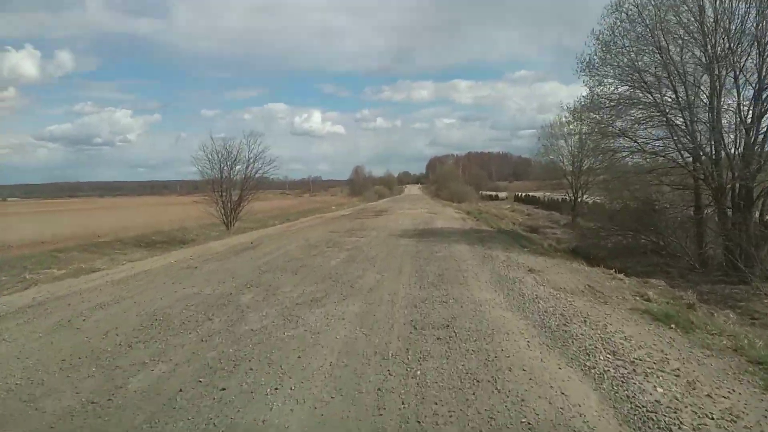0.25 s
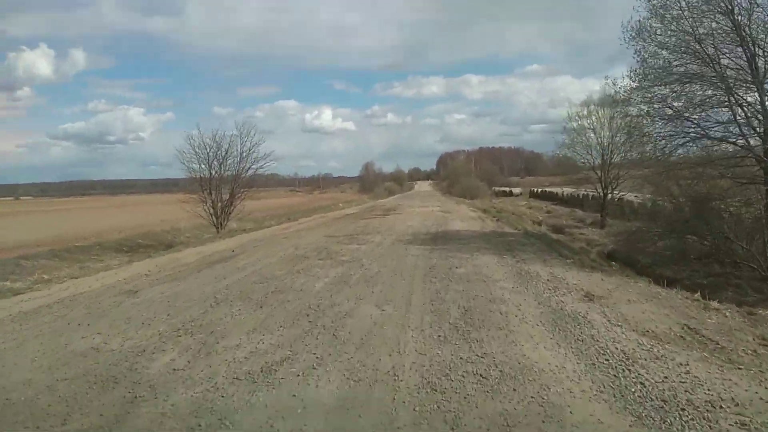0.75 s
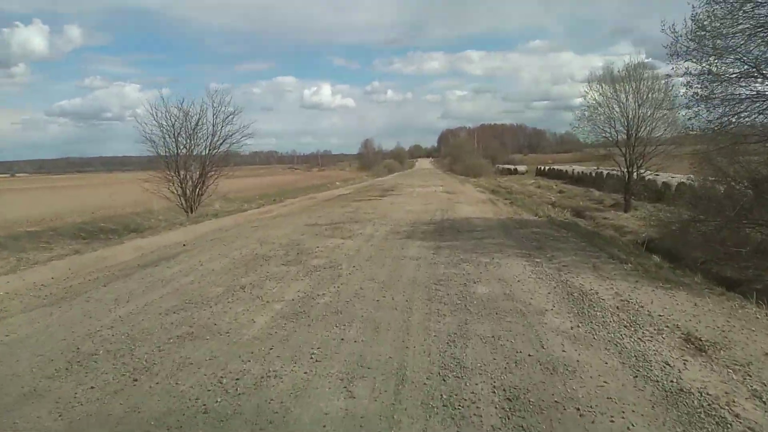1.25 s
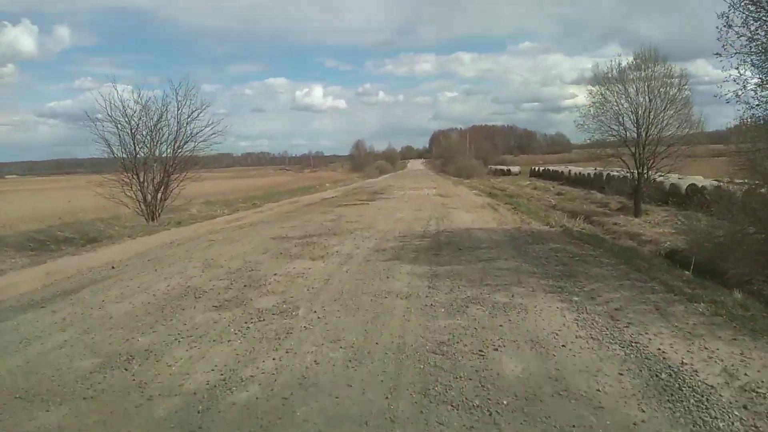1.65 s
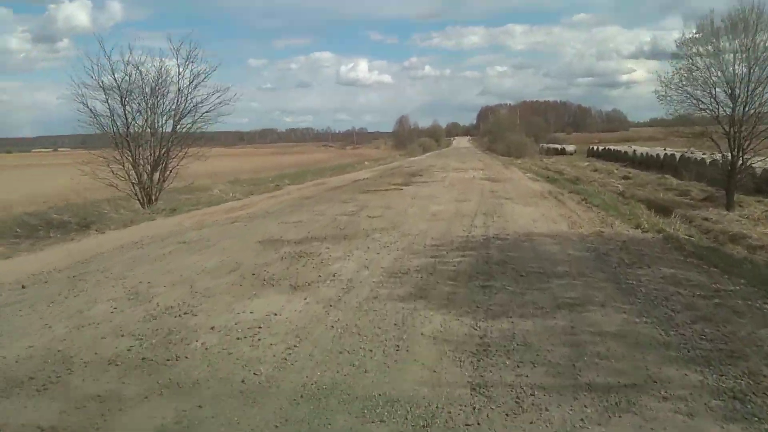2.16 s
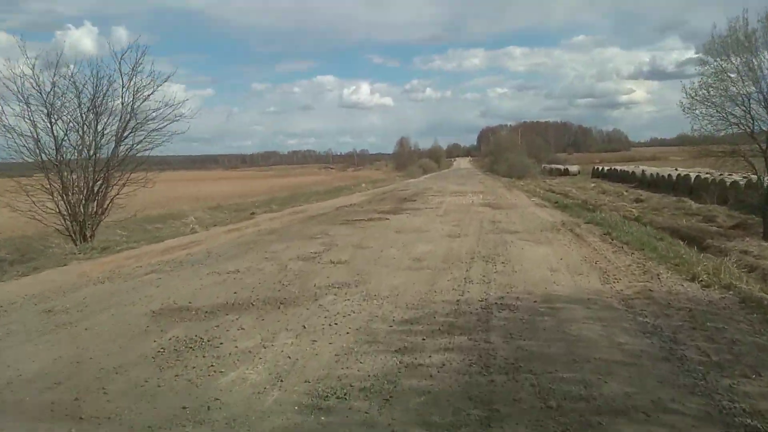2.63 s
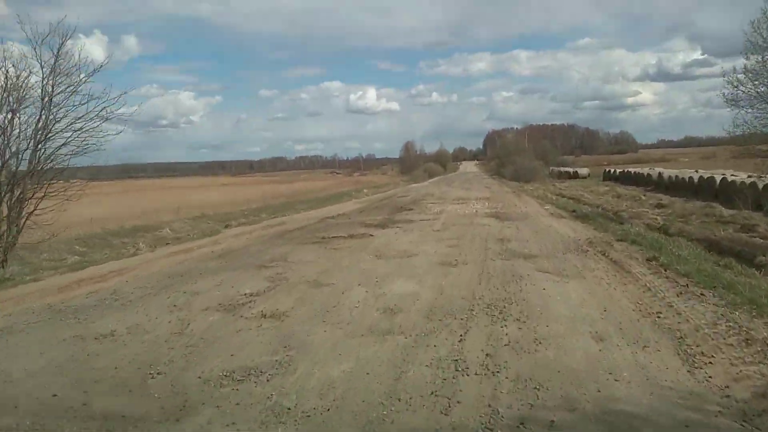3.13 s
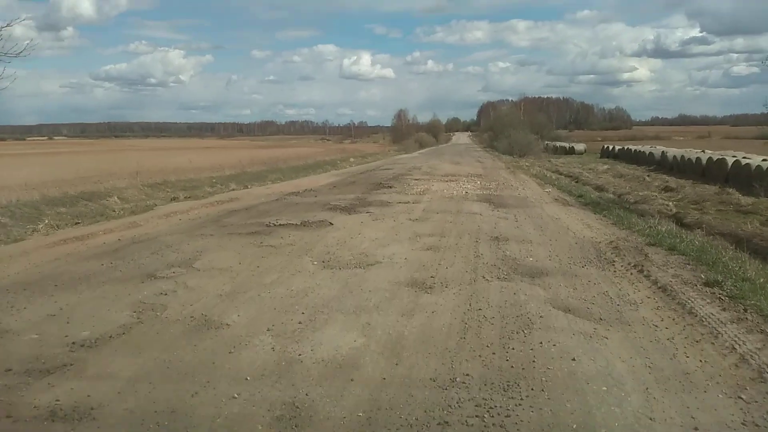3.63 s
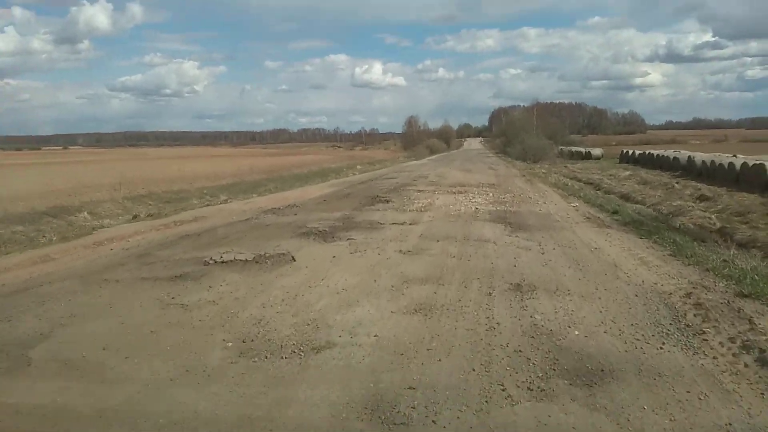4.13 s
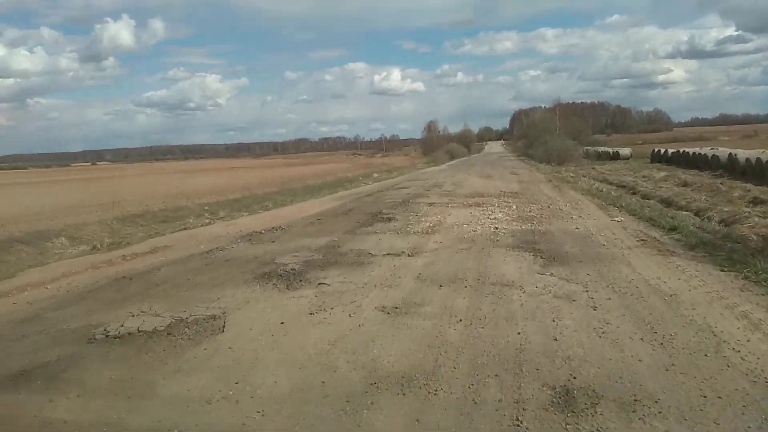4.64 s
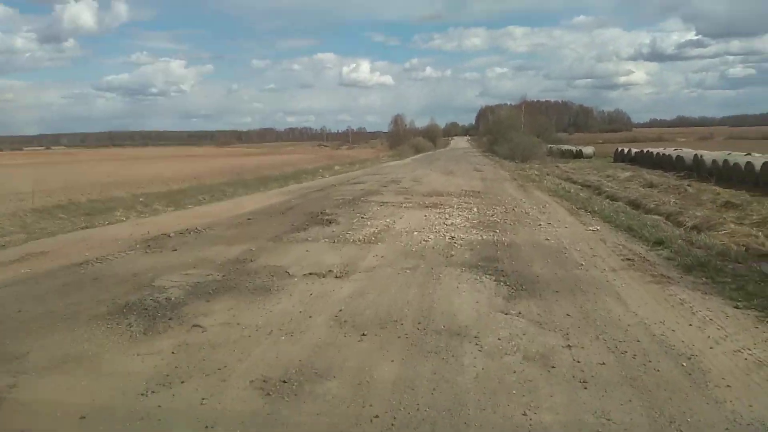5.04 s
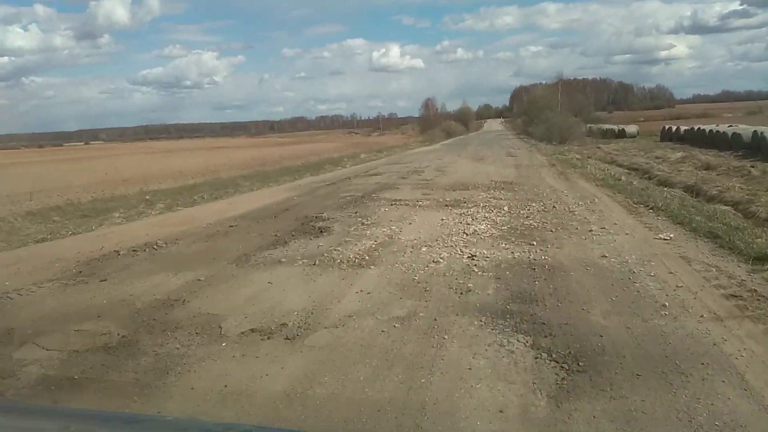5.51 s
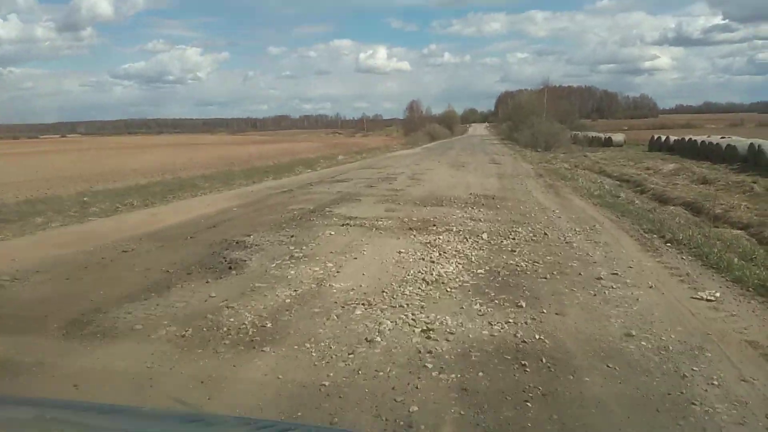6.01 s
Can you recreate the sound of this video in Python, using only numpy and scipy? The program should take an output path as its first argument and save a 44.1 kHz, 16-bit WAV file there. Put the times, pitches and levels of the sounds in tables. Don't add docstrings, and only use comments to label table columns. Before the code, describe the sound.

Inside a car on a potholed gravel road, heard in stereo close to the dashboard. It opens with a dry plastic tick and a burst of small rattling within the first 0.2 s, then hollow knocks at about 0.25, 0.4 and 0.9 s with low body boom. Stones thud dully on the floor pan; trim clunks and buzzes, with metallic chinks above. Sharper stone strikes land near 1.5 and 1.9 s, harder wheel knocks at 2.4 and 2.6 s. From 3.1 to 3.7 s comes the deepest boom, with several thuds and a bright chink near 3.3 s. A hard strike hits at 4.45 s, then a short easing. A run of quick knocks fills 4.9 to 5.3 s. It falls nearly quiet until 5.7 s, leaving faint rumble and hiss; then knocks, a thin metal glint near 5.84 s and rattles return to the end at 6.3 s.

```python
import sys
import numpy as np
from scipy import signal
from scipy.fft import rfft, irfft
from scipy.io import wavfile
from scipy.ndimage import uniform_filter1d

SR = 44100
rng = np.random.default_rng(int(sys.argv[2]) if len(sys.argv) > 2 else 0)


def store_pcm(level_fs):
    pcm = np.round(np.clip(level_fs, -1, 1) * 32767).astype(np.int16)
    wavfile.write(sys.argv[1], SR, np.atleast_2d(pcm).T)


def ratio(d):
    e = np.asarray(d, float) / 20
    return 10 ** e


N = 276507
BINS_HZ = np.fft.rfftfreq(8192, 1 / SR) + 1


def rms_one(x):
    return x / np.sqrt(np.mean(x ** 2) + 1e-20)


def in_time(rows):
    s, db = np.transpose(rows)
    return ratio(np.interp(np.arange(N) / SR, s, db))


def at_hz(points, hz):
    points_hz, value = np.transpose(points)
    return np.interp(np.log(hz), np.log(points_hz), value)


def sides(db):
    return ratio(np.array([[0.5], [-0.5]]) * db)


def resonate(x, hz, width_hz):
    r = np.exp(-np.pi * width_hz / SR)
    zeros = np.array([1, 0, -1]) * (1 - r * r) / 2
    poles = [1, -2 * r * np.cos(2 * np.pi * hz / SR), r * r]
    return signal.lfilter(zeros, poles, x)


def contacts(per_s, spread_db):
    when, size = rng.random(N), rng.uniform(-1, 1, N)
    hit = when < per_s / SR
    out = np.full(N, 1e-18)
    size = size[hit]
    out[hit] = np.sign(size) * ratio(spread_db * np.minimum(-np.log(np.abs(size)), 4))
    return out


def evened(x, over_s, share):
    power = uniform_filter1d(np.mean(rms_one(x) ** 2, axis=0), int(over_s * SR)) + 0.024
    return rms_one(x / power ** (share / 2))


def motion(rows, rise, fall, rest_db):
    t = np.arange(0, N + 64, 64) / SR
    rows = np.array(rows)
    start = rows[:, :1]
    end = start + np.abs(rows[:, 1:2])
    loss_db = rise * np.maximum(start - t, 0) + fall * np.maximum(t - end, 0)
    gains = []
    for db in rows[:, 2:].T:
        power = ratio(rest_db) ** 2 + np.sum(ratio(db[:, None] - loss_db) ** 2, axis=0)
        gains.append(np.interp(np.arange(N) / SR, t, np.sqrt(power)))
    return gains


# (f/Hz, left-right level/dB)
LEANING = [(60, 6.3), (150, 2.2), (380, 0), (950, .8), (2400, 0), (5500, 1.7), (9800, -.8), (12500, -8),
           (15000, -9)]


def shaken(modes, per_s, spread_db, own_db, over_s):
    out = 0
    for hz, width_hz, db in modes:
        shared = contacts(per_s, spread_db)
        own = np.array([contacts(per_s, spread_db) for side in "LR"])
        force = shared + ratio(own_db) * own
        ringing = resonate(resonate(force, hz, 2.0 * width_hz), hz, width_hz)
        out = out + ratio(db) * sides(at_hz(LEANING, hz)) * rms_one(ringing)
    return evened(out, over_s, share=0.32)


# (f/Hz, left-right likeness [0-1])
LIKENESS = [(60, 0.89), (180, 0.81), (600, 0.6), (900, 0.33), (1650, 0.25)]


def cabin_paths(colour_db, t60, crack_db, count, crack_s=0.031):
    t = np.arange(8192) / SR
    mid, side = rfft(rng.standard_normal((2, count, 1, 8192)))
    alike = np.clip(at_hz(LIKENESS, BINS_HZ), -1, 1)
    pair = np.sqrt(1 + alike) * mid + np.sqrt(1 - alike) * side * [[1], [-1]]
    place = rng.permutation(count)[:, None, None] / count
    ripple_db = 5.0 * np.sin(9.0 * np.log(BINS_HZ) + 2 * np.pi * place)
    noise = irfft(pair * ratio(colour_db + ripple_db) * sides(at_hz(LEANING, BINS_HZ)))
    crack = ratio(-60 * t / crack_s)
    rise = np.minimum(t / 0.0008, 1)
    return noise * (ratio(-60 * t / t60) + ratio(crack_db) * crack) * rise


def rattling(level, colour_db, per_s, spread_db, t60, crack_db, count):
    busy = per_s * (level / level.max()) ** 0.3
    out = 0
    for path in cabin_paths(colour_db, t60, crack_db, count):
        touches = contacts(busy / count, spread_db)[None]
        out = out + signal.oaconvolve(touches, path, axes=1)[:, :N]
    return level * evened(out, over_s=0.13, share=0.068)


def clacks(table, colour_db, t60, crack_db, broad, sharpness, lift_db):
    out = np.zeros((2, N + 8192))
    paths = cabin_paths(colour_db, t60, crack_db, count=len(table), crack_s=0.0032)
    for (s, db, hz), path in zip(table, paths):
        sound = broad * path + resonate(path, hz, hz / sharpness)
        i = round(s * SR)
        out[:, i:i + 8192] += ratio(db + lift_db) * sound / np.abs(sound).max()
    return out[:, :N]


def after_rattle(table, t60):
    kicks = np.full(N, 1e-12)
    kicks[[round(row[0] * SR) for row in table]] = ratio(np.array(table)[:, 1])
    return signal.lfilter([1], [1, -ratio(-60 / (t60 * SR))], kicks)


# (t/s, shell boom level/dB)
HEAVES = [(0.023, -33.5), (0.264, -27.5), (0.436, -31.5), (0.585, -31.5), (0.844, -24), (1.058, -33.5),
          (1.192, -34), (1.405, -31.5), (1.617, -29), (1.918, -25.5), (2.16, -31.5), (2.268, -29),
          (2.448, -32), (2.664, -23), (2.92, -39.5), (3.317, -19.5), (3.464, -28.5), (3.645, -26.5),
          (3.92, -26.5), (4.192, -29), (4.498, -33.5), (4.653, -36), (4.8, -42.5), (4.913, -37.5),
          (5.126, -23.5), (5.403, -31), (5.523, -40), (5.894, -33.5), (6.114, -34.5)]
# (f/Hz, width f/Hz, level/dB)
SHELL = [(30.5, 27, -16), (56.3, 32, -15.5), (62.3, 9.9, -6), (71.3, 10.5, -2), (87.7, 32, -1.5)]


def shell_boom():
    heave, = motion([(s, 0, db) for s, db in HEAVES], rise=78, fall=145, rest_db=-51.5)
    return heave * ratio(1.5) * shaken(SHELL, 300, spread_db=2.5, own_db=-12, over_s=0.067)


# (t/s, length t/s, tyre and suspension shake level/dB)
PATCHES = [(0.001, 0.0041, -41), (0.067, 0.078, -34), (0.191, 0.14, -27.5), (0.42, 0.054, -26.5),
           (0.683, 0.11, -49), (0.805, 0.12, -31), (1.084, 0.085, -31.5), (1.323, 0.017, -27.5),
           (1.415, 0.2, -31.5), (1.685, 0.014, -46), (1.824, 0.15, -30.0), (2.033, 0.0078, -30.5),
           (2.125, 0.13, -29.5), (2.301, 0.037, -28), (2.413, 0.0062, -22.5), (2.564, 0.16, -34.5),
           (2.794, 0.019, -55), (2.905, 0.092, -38), (3.109, 0.32, -27), (3.573, 0.12, -28.5),
           (3.822, 0.082, -28.5), (4.046, 0.074, -27.5), (4.275, 0.15, -66), (4.45, 0.03, -29.5),
           (4.802, 0.13, -37), (5.019, 0.14, -25.5), (5.293, 0.047, -48), (5.507, 0.0021, -44.5),
           (5.751, 0.14, -34.5), (5.991, 0.12, -31.5)]
# (f/Hz, width f/Hz, level/dB)
WHEEL = [(138, 28, -1), (147.5, 43, -6), (175, 17.7, -4), (190, 26, -1.5), (225.4, 57, -12)]


def wheel_shake():
    shake, = motion(PATCHES, rise=840, fall=202, rest_db=-70)
    return shake * ratio(-1.0) * shaken(WHEEL, 120, spread_db=4.5, own_db=-11, over_s=0.01)


# (t/s, peak level/dB, ring f/Hz)
KNOCKS = [(0.241, -16, 184), (0.416, -12.5, 147), (0.802, -28, 184), (0.87, -11.5, 182),
          (2.411, -20.5, 132), (2.614, -11.5, 162), (3.11, -18, 173), (3.31, -16, 72),
          (3.577, -13.5, 172.6), (3.677, -26, 151), (4.045, -19.5, 185.4), (4.789, -32, 182.2),
          (4.867, -18.5, 179.7), (5.013, -21, 152), (5.079, -16, 162.7), (5.141, -12.5, 165),
          (5.206, -19.5, 159.4), (5.291, -24, 170), (5.783, -21, 190.6), (5.868, -27, 169),
          (5.988, -22, 199), (6.066, -17.5, 136), (6.09, -18.5, 157)]
# (t/s, peak level/dB, ring f/Hz)
STRIKES = [(0.077, -28, 139), (0.175, -21, 202.6), (1.101, -24.5, 191), (1.329, -21, 171),
           (1.445, -21, 239), (1.493, -14.5, 175), (1.906, -10.5, 175), (2.176, -23.5, 188),
           (2.563, -23, 147), (2.932, -33, 151), (2.975, -26, 182), (3.819, -26, 159), (4.433, -23.5, 205),
           (4.449, -11, 188.5), (4.465, -24.5, 202), (5.736, -26, 191.5)]


def knocks():
    out, t = np.zeros(N + SR), np.arange(SR // 2) / SR
    blows = [(*row, -27.5) for row in KNOCKS] + [(*row, -10.5) for row in STRIKES]
    for (s, db, hz, arm_db), (a, b) in zip(blows, rng.random((len(blows), 2))):
        arm = np.sin(2 * np.pi * (280 + 70 * a) * t)
        arm += 0.76 * np.sin(2 * np.pi * (380 + 90 * b) * t)
        ring = np.sin(2 * np.pi * hz * t) + ratio(arm_db) * arm
        t60 = np.clip(0.16 * ratio(-0.42 * (db + 17.5)), 0.03, 0.4)
        rise = np.minimum(t / 0.0036, 1)
        i = round(s * SR)
        out[i:i + len(t)] += ratio(db - 2.5 - 60 * t / t60) * rise * ring
    return out[:N] * sides(3.8)


# (t/s, level/dB)
PAN_LEVEL = [
    (0, 2),
    (1.5, 4),
    (3.0, -0.5),
    (3.9, 0),
    (4.5, -7),
    (5.2, -6),
    (6.27, -2),
]
# (f/Hz, width f/Hz, level/dB)
PAN = [(261, 39, -1), (309, 104, -8.5), (358, 147, -1), (419.7, 55, -4), (484, 50, -5.5)]


def floor_pan(buzz):
    wheels, = motion(PATCHES, rise=750, fall=230, rest_db=-65)
    flexing = wheels ** 0.48 * buzz ** 0.5 * in_time(PAN_LEVEL)
    return flexing * ratio(-6.0) * shaken(PAN, 200, spread_db=3.0, own_db=-3, over_s=0.2)


# (t/s, peak level/dB, ring f/Hz)
THUDS = [(0.062, -39, 417), (0.104, -24, 258), (0.178, -22, 244), (0.408, -53, 437), (0.429, -26, 252),
         (0.71, -34, 460), (0.802, -34, 262), (1.015, -29, 396), (1.073, -30, 299), (1.158, -29, 245),
         (1.23, -29, 245), (1.311, -34, 245), (1.341, -27, 280), (1.575, -23, 256), (1.825, -40, 334),
         (1.888, -20, 294), (1.907, -16, 261), (1.989, -34, 298), (2.124, -26.5, 280), (2.273, -28, 298),
         (2.384, -36, 415), (2.413, -38, 394), (2.559, -20, 240), (2.58, -31, 272), (2.654, -25.5, 285),
         (3.063, -41, 261), (3.118, -39, 253), (3.2, -20, 247), (3.236, -21, 261), (3.313, -18.5, 261),
         (3.382, -21, 310), (3.462, -23.5, 325), (3.559, -41, 260), (3.589, -29, 244), (3.805, -36, 246),
         (3.862, -26, 314), (4.037, -41, 247), (4.432, -28.5, 294), (4.865, -38, 248), (5.015, -20, 248),
         (5.04, -21, 248), (5.739, -41.5, 243), (5.791, -24.5, 247), (5.882, -30, 254), (5.975, -37, 242),
         (6.072, -23, 242)]


def thuds():
    out, t = np.zeros((2, N + SR)), np.arange(SR // 5) / SR
    t60, rise_s = 0.093, 0.0028
    for (s, db, hz), lean in zip(THUDS, rng.uniform(-1.3, 1, len(THUDS))):
        phase = 0.58 * lean * np.array([[1], [-1]])
        ring = np.sin(2 * np.pi * hz * t + phase)
        ring += ratio(-13.5) * np.sin(2 * np.pi * 1.45 * hz * t)
        i = round(s * SR)
        out[:, i:i + len(t)] += ratio(db - 2.5 - 60 * t / t60) * np.minimum(t / rise_s, 1) * ring
    return out[:, :N]


# (t/s, length t/s, level/dB)
BUZZES = [(0.045, 0.14, -38.5), (0.391, 0.24, -46), (0.702, 0.35, -46), (1.076, 0.37, -44.5),
          (1.457, 0.1, -42), (1.661, 0.095, -48.5), (1.815, 0.2, -46), (2.063, 0.3, -45.5),
          (2.411, 0.17, -42), (2.658, 0.03, -41.5), (2.758, 0.14, -48.5), (2.876, 0.15, -43),
          (3.11, 0.33, -49), (3.264, 0.11, -37.5), (3.576, 0.67, -47.5), (3.806, 0.051, -48.5),
          (4.443, 0.13, -49), (4.851, 0.066, -48), (5.037, 0.027, -50.5), (5.141, 0.084, -46),
          (5.771, 0.011, -41), (5.87, 0.026, -46.5), (5.973, 0.027, -50.5), (6.091, 0.102, -41)]


def trim_motion():
    return motion(BUZZES, rise=560, fall=138, rest_db=-72)[0]


# (f/Hz, width f/Hz, lift level/dB)
PANELS = [(606.3, 14, 10.5), (830, 35, -3.5), (872.5, 18.4, 11), (1063, 26, 9.5), (1360, 120, 3),
          (1910, 180, 7), (2440, 120, 7)]
# (f/Hz, level/dB per Hz)
TRIM = [(300, -48), (450, -16), (560, -5), (800, -6.5), (1400, -12.5), (1700, -19.5), (2300, -21.5),
        (5000, -41.5)]


def trim(level):
    colour_db = at_hz(TRIM, BINS_HZ)
    for hz, width_hz, lift_db in PANELS:
        colour_db = colour_db + lift_db / (1 + (2 * (BINS_HZ - hz) / width_hz) ** 2)
    return rattling(level, colour_db, 1500, spread_db=3.5, t60=0.087, crack_db=6.0, count=8)


# (f/Hz, level/dB per Hz)
RATTLE = [(1150, -37), (1700, -1), (2050, 0.5), (2600, -4.5), (3300, -3.5), (4300, -7.5), (5500, -13),
          (7000, -65)]
# (t/s, peak level/dB, ring f/Hz)
CLUNKS = [(0.048, -44, 633), (0.066, -30, 600), (0.168, -36, 875), (0.237, -19.5, 580), (0.301, -30, 640),
          (0.4, -27.5, 870), (0.446, -27, 634), (0.503, -28, 654), (0.675, -37, 603), (0.696, -36, 589),
          (0.784, -28.5, 856), (0.86, -27.5, 744), (1.214, -35.5, 620), (1.316, -26.5, 607),
          (1.445, -27.5, 595), (1.679, -45.5, 615), (1.7, -44, 645), (1.887, -22, 660), (2.053, -40, 640),
          (2.154, -57, 584), (2.176, -31.5, 608), (2.245, -33, 610), (2.268, -43, 614), (2.3, -30, 505),
          (2.408, -26.5, 890), (2.559, -29, 834), (2.655, -34, 600), (2.862, -39, 1080), (3.108, -31, 870),
          (3.182, -28, 664), (3.222, -26, 611), (3.264, -33, 501), (3.814, -31, 864), (3.865, -29, 830),
          (3.9, -27.5, 570), (3.991, -31, 625), (4.048, -33, 670), (4.163, -37, 540), (4.298, -37, 616),
          (4.434, -34, 546), (5.034, -37.5, 584), (5.063, -33, 673), (5.139, -40, 630), (5.2, -29.5, 616),
          (5.274, -34.5, 690), (5.695, -45.5, 1360), (5.737, -37, 1070), (5.776, -33, 820),
          (5.876, -28.5, 890), (5.978, -35, 890), (6.078, -29.5, 705), (6.107, -43, 530)]


def panels(buzz):
    dull_db = np.maximum(at_hz(TRIM, BINS_HZ), at_hz(RATTLE, BINS_HZ) - 18)
    clunks = clacks(CLUNKS, dull_db, t60=0.1, crack_db=16.0, broad=0.4, sharpness=16.0, lift_db=-1.0)
    level = np.hypot(ratio(-1.5) * buzz, ratio(-15.5) * after_rattle(CLUNKS, t60=0.22))
    out = ratio(2.0) * trim(level) + clunks
    out[0] = np.roll(out[0], 9)
    return out


# (f/Hz, level/dB per Hz)
JINGLE = [(3800, -21.5), (5800, 0), (7500, 1), (9000, -2), (10500, -5), (13000, -9.5), (14500, -17.5),
          (15700, -24)]


def chattering(rattle, jingle):
    hard = rattling(rattle, at_hz(RATTLE, BINS_HZ), 1500, spread_db=5.5, t60=0.086, crack_db=-29.0, count=6)
    thin = rattling(jingle, at_hz(JINGLE, BINS_HZ), 1800, spread_db=7.5, t60=0.26, crack_db=-27.0, count=6)
    return ratio(4.0) * hard + ratio(6.0) * thin


# (t/s, length t/s, hard rattle level/dB, thin jingle level/dB)
HOPS = [(0.054, 0.12, -43.5, -52), (0.31, 0.045, -56.5, -67.5), (0.415, 0.19, -50.5, -60),
        (0.752, 0.05, -50.5, -57), (0.854, 0.11, -50.5, -57), (1.028, 0.058, -52, -60.5),
        (1.249, 0.072, -60.5, -64), (1.33, 0.051, -52, -66), (1.461, 0.038, -44.5, -50),
        (1.726, 0.062, -57, -63.5), (1.851, 0.28, -58.5, -62), (1.893, 0.066, -51, -62),
        (2.246, 0.072, -51, -57.5), (2.422, 0.17, -48, -53.5), (2.895, 0.1, -48, -56.5),
        (3.114, 0.13, -66.5, -74), (3.25, 0.098, -47.5, -57), (3.587, 0.13, -54, -64.5),
        (3.821, 0.23, -51.5, -59.5), (4.271, 0.085, -70.5, -90), (4.456, 0.11, -51, -58.5),
        (4.75, 0.054, -70, -68.5), (4.886, 0.005, -58, -60), (5.042, 0.045, -57.5, -76),
        (5.183, 0, -53.5, -74), (5.431, 0.0, -81, -70.5), (5.531, 0.069, -68.5, -87),
        (5.771, 0.013, -53.5, -62), (5.824, 0, -51, -53), (5.98, 0.2, -62.5, -85), (6.107, 0.081, -47, -54)]
# (t/s, peak level/dB)
TICKS = [(0.002, -33), (0.0483, -47), (0.1065, -28.5), (0.4182, -50), (0.4464, -53), (0.541, -51),
         (0.852, -44), (0.2172, -54), (1.0797, -40), (1.4316, -43), (1.4895, -34), (1.711, -45),
         (1.8784, -37), (2.177, -43), (2.2548, -54), (2.409, -49), (2.876, -45), (3.1073, -50.5),
         (3.2286, -37), (3.2513, -52), (3.294, -42), (3.811, -52.5), (4.467, -58.5), (5.0834, -41),
         (5.183, -47.5), (5.507, -60), (5.5326, -45.5), (5.7404, -45), (5.975, -47), (6.0617, -38.5)]
# (t/s, peak level/dB, ring f/Hz)
CHINKS = [(0.0483, -42.5, 8980), (0.1067, -32, 7400), (0.2164, -39, 5300), (0.2748, -39.5, 7350),
          (0.417, -41, 7620), (0.4464, -37, 6060), (0.5427, -42.5, 7400), (0.7372, -51, 6030),
          (0.8535, -40.5, 6060), (0.9167, -44, 6200), (1.0246, -38.5, 7600), (1.079, -39.5, 6200),
          (1.2516, -43.5, 8500), (1.3174, -45, 5450), (1.3763, -49, 5230), (1.4316, -43, 8060),
          (1.7105, -46.5, 8200), (1.7968, -49, 5870), (1.8795, -37, 6120), (2.177, -44.5, 5200),
          (2.253, -42, 6900), (2.2942, -36, 8800), (2.4089, -50, 6620), (2.6414, -40.5, 8650),
          (2.8764, -41, 6840), (2.9173, -40, 7780), (2.9372, -38, 6570), (3.1094, -47.5, 5200),
          (3.2261, -58.5, 5210), (3.252, -39, 5420), (3.291, -32.5, 12400), (3.6737, -48, 6800),
          (3.8077, -49.5, 6610), (3.8514, -46, 6800), (4.4076, -62, 11200), (4.424, -42.5, 7200),
          (4.4353, -39.5, 7240), (4.7414, -52, 8930), (4.8684, -44, 7080), (5.0072, -45.5, 6700),
          (5.0368, -43.5, 9170), (5.0843, -58, 5530), (5.1806, -47.5, 6790), (5.4385, -63, 7120),
          (5.5064, -55, 6600), (5.7423, -45.5, 9300), (5.8127, -37, 8700), (5.976, -43, 5200),
          (6.0152, -46, 7280), (6.0403, -47, 7500), (6.0826, -51, 5300), (6.1075, -37, 6870),
          (0.2164, -50, 11600), (0.7372, -48, 13300), (4.742, -52, 9200), (4.828, -48.5, 11800),
          (4.9706, -65, 14000), (5.0843, -69, 10200), (5.4086, -63, 12500), (5.437, -57, 11050),
          (5.5523, -58, 9020), (5.8117, -47, 9150), (5.8397, -35.5, 11100)]


def small_things():
    plastic = [(s, db, 3040) for s, db in TICKS]
    touches = plastic + CHINKS
    bright_db = np.maximum(at_hz(RATTLE, BINS_HZ), at_hz(JINGLE, BINS_HZ) - 6)
    ticks = clacks(touches, bright_db - 3, t60=0.069, crack_db=8.5, broad=0.25, sharpness=6.7, lift_db=2.5)
    rattle, jingle = motion(HOPS, rise=430, fall=119, rest_db=-81.5)
    chatter = after_rattle(touches, t60=0.16)
    rattle = np.hypot(ratio(-4.0) * rattle, ratio(-20.0) * chatter)
    jingle = np.hypot(ratio(-2.0) * jingle, ratio(-23.0) * chatter)
    out = chattering(rattle, jingle) + ticks
    out[0] = np.roll(out[0], 16)
    return out


# (t/s, level/dB)
DRONE = [(0.0, -43.5), (0.21, -44.5), (3.28, -51.5), (3.46, -51.5), (3.87, -47.5), (4.85, -57.5),
         (5.08, -47), (5.41, -51), (5.55, -65.5), (5.62, -63), (5.7, -63), (5.9, -62), (6.27, -47)]
# (f/Hz, width f/Hz, level/dB)
HUMMING = [(618.7, 55, -3), (700, 65, -4), (888, 25, -22.5), (1059, 49, -9), (1355, 53, -13.5)]


def panel_drone():
    return in_time(DRONE) * ratio(-3.0) * shaken(HUMMING, 900, spread_db=2.0, own_db=1.0, over_s=0.3)


def hiss():
    noise = resonate(rng.standard_normal((2, N)), 8800, 4000.0)
    return ratio(-81) * rms_one(resonate(noise, 11000, 4500.0))


def scene():
    buzz = trim_motion()
    lows = shell_boom() + wheel_shake() + knocks()
    pan = floor_pan(buzz) + thuds()
    loose = panels(buzz) + small_things()
    return lows + pan + loose + panel_drone() + hiss()


# (f/Hz, level/dB per bin)
MUTING = [(300, -97), (1600, -99), (4500, -100), (7000, -106), (12500, -108), (13600, -100), (14600, -89),
          (15500, -77)]


def mute_faint_bands(x):
    shift = 283
    unsure_db, masked_db, weak_db = 6.0, 4.5, 9.0
    hz, _, cells = signal.stft(np.pad(x, ((0, 0), (shift, 0))), SR, "cosine", 2048, 1024)
    band = np.arange(len(hz)) // 8
    line_db = 20 * np.log10(np.abs(cells) + 1e-10)
    power = np.add.reduceat(np.abs(cells) ** 2, np.arange(0, len(hz), 8), axis=1) / 8
    band_db = 10 * np.log10(power + 1e-20)
    around_db = 10 * np.log10(uniform_filter1d(power, size=9, axis=1) + 1e-20)
    wavering = unsure_db * rms_one(uniform_filter1d(rng.standard_normal(power.shape), size=5, axis=2))
    broad = 0.75 * unsure_db * rms_one(uniform_filter1d(wavering, size=7, axis=1))
    upper_db = np.clip(45 * np.log10(3000 / (hz + 1)), 0, 90)[:, None]
    heard_db = (band_db + broad)[:, band] - at_hz(MUTING, hz + 1)[:, None]
    clear_db = (band_db + wavering - around_db + masked_db)[:, band] + upper_db
    strong_db = line_db - around_db[:, band] + weak_db + upper_db
    margin_db = np.minimum(np.minimum(heard_db, clear_db), strong_db)
    keep = np.clip(margin_db / 2, 0, 1)
    return signal.istft(cells * keep, SR, "cosine", 2048, 1024)[1][:, shift:shift + N]


def low_pass(x):
    return signal.sosfilt(signal.butter(12, 15730, fs=SR, output="sos"), x)


def record(dry):
    limited = 0.4 * np.tanh(dry / 0.4)
    mix = mute_faint_bands(limited)
    return low_pass(mix)


dry = scene()
out = record(dry)
store_pcm(out)
```